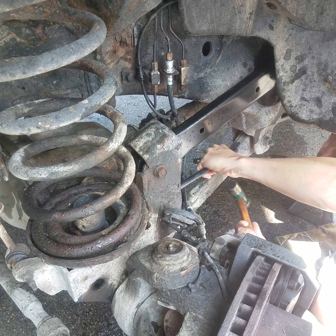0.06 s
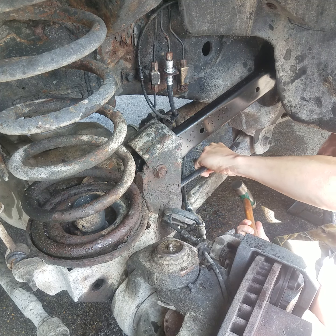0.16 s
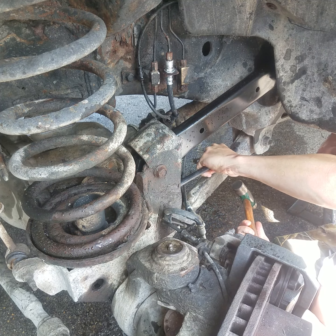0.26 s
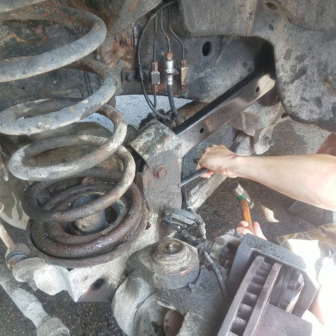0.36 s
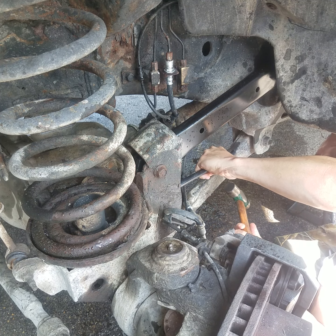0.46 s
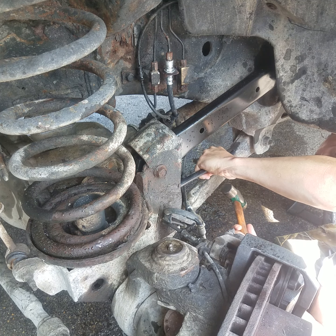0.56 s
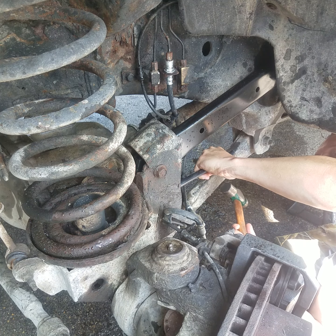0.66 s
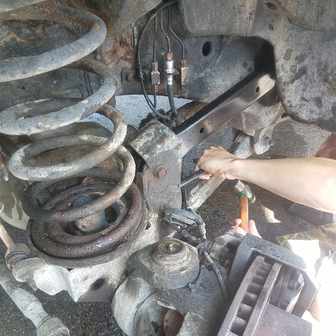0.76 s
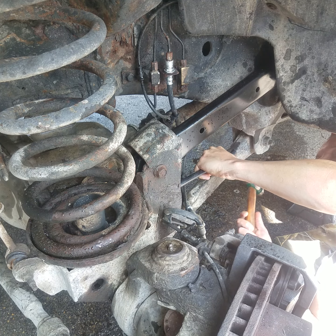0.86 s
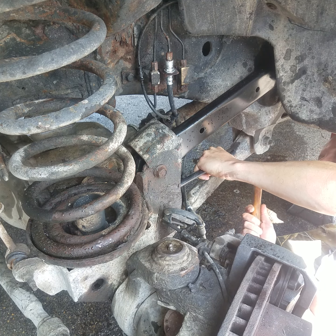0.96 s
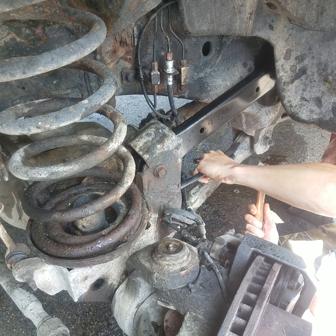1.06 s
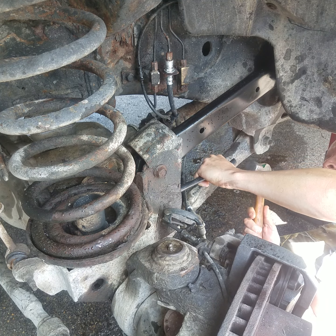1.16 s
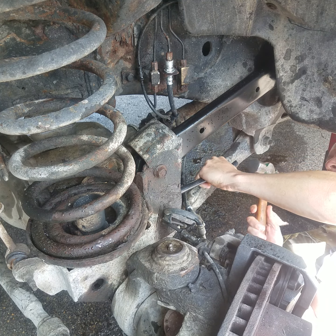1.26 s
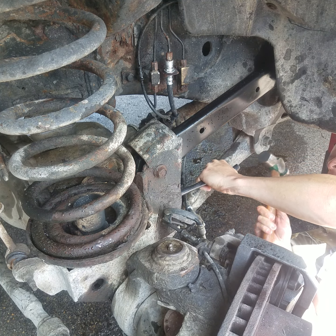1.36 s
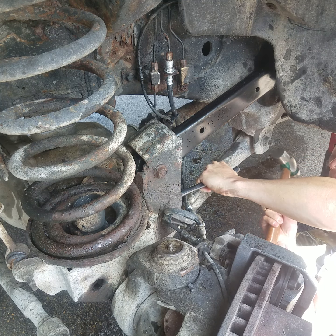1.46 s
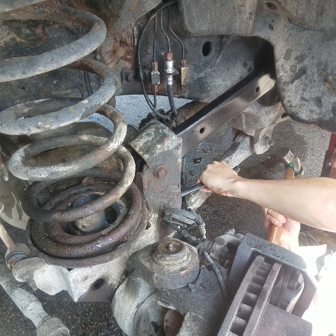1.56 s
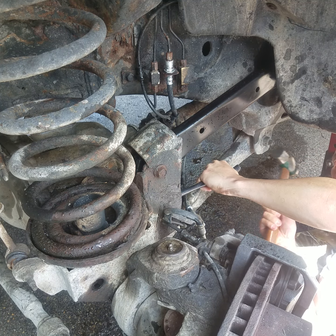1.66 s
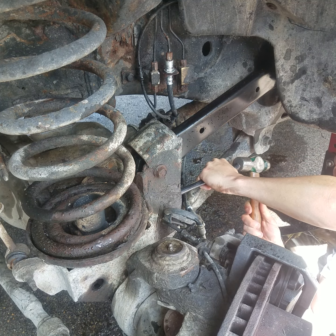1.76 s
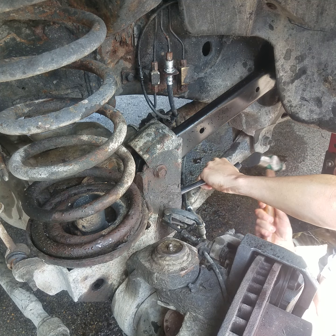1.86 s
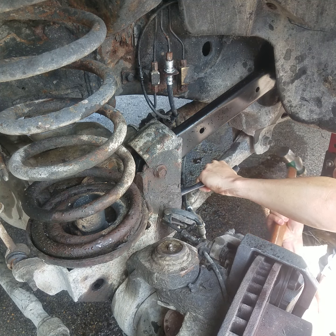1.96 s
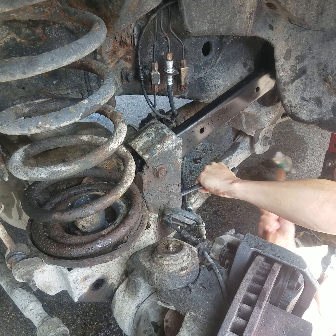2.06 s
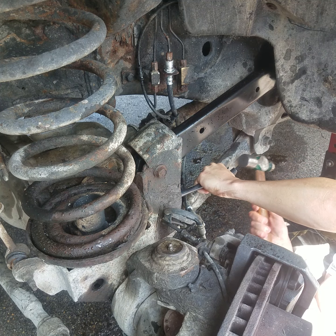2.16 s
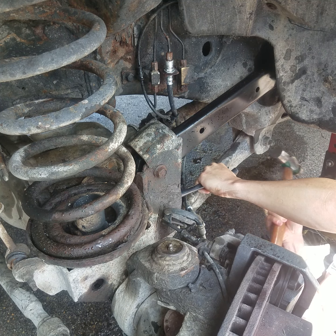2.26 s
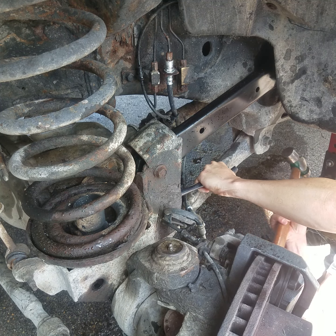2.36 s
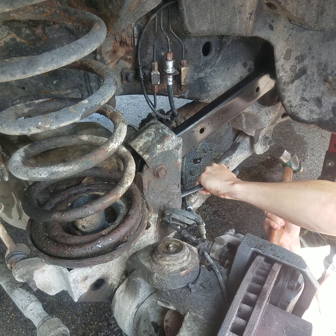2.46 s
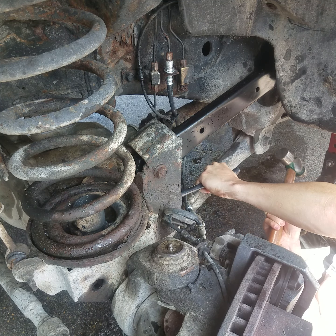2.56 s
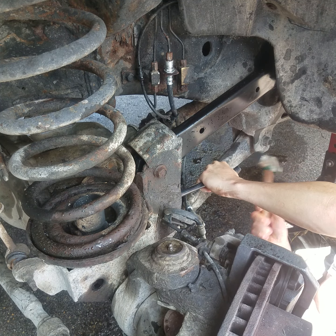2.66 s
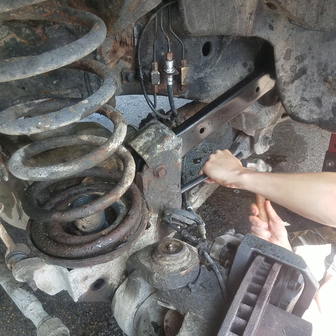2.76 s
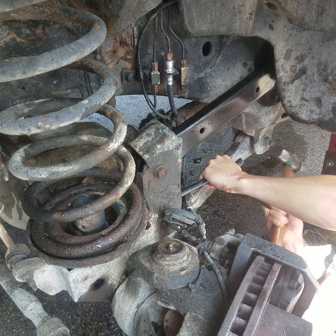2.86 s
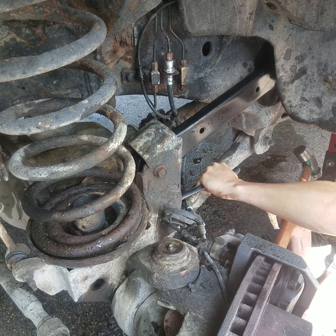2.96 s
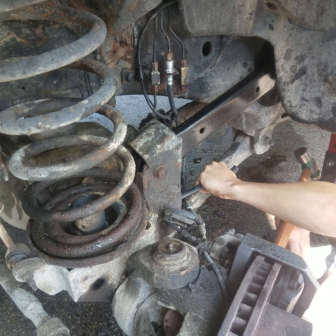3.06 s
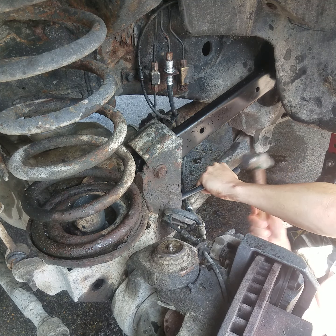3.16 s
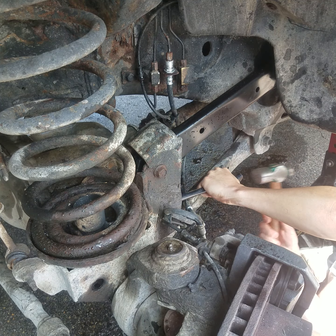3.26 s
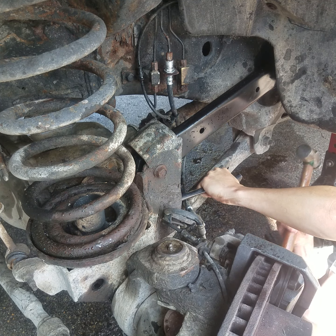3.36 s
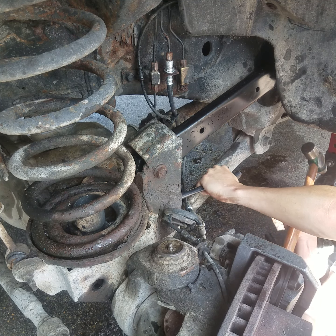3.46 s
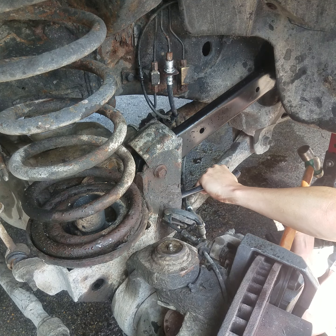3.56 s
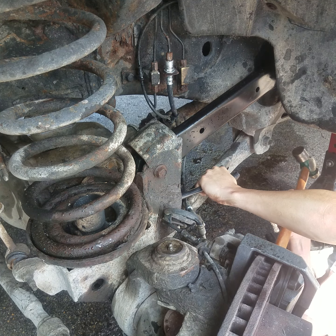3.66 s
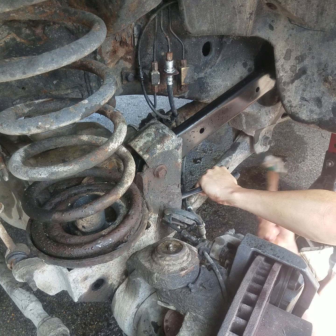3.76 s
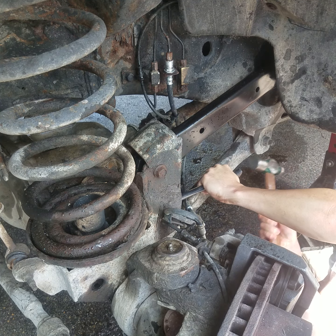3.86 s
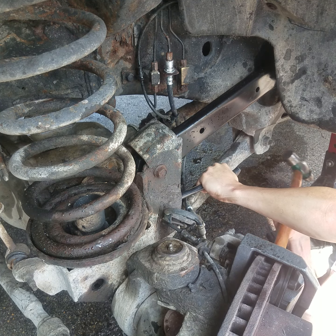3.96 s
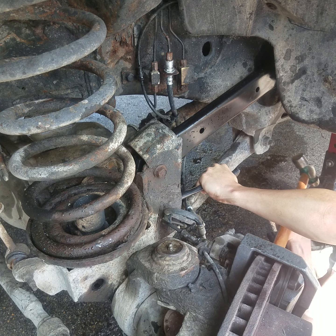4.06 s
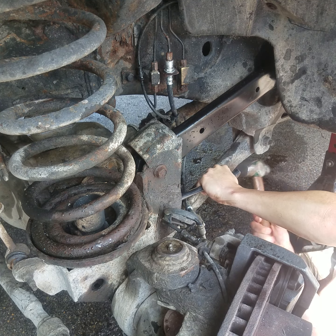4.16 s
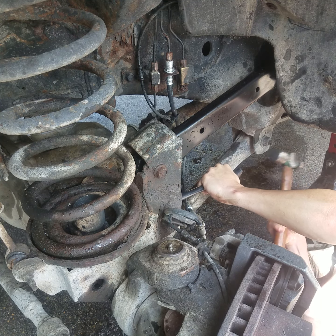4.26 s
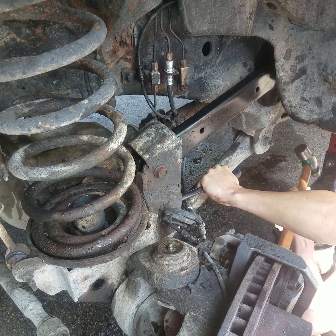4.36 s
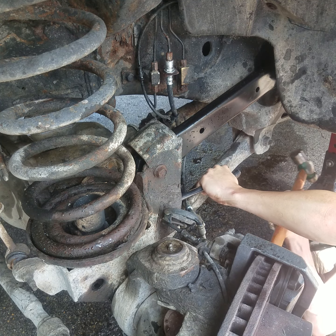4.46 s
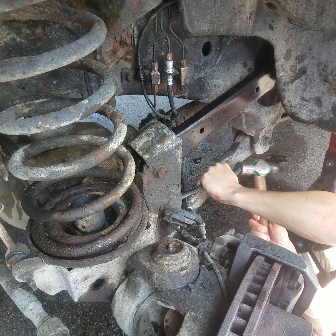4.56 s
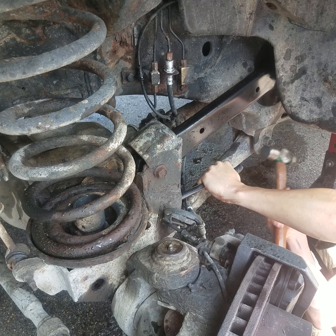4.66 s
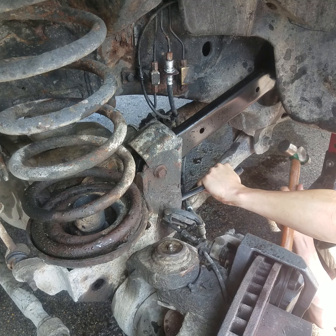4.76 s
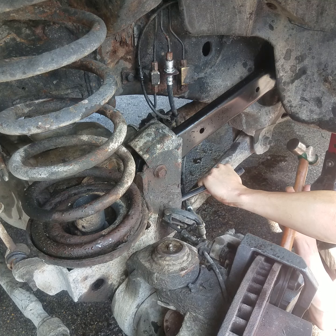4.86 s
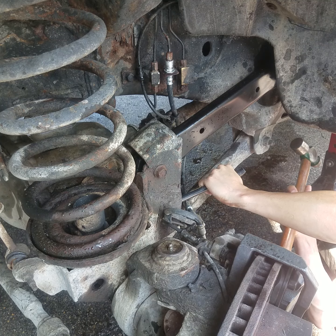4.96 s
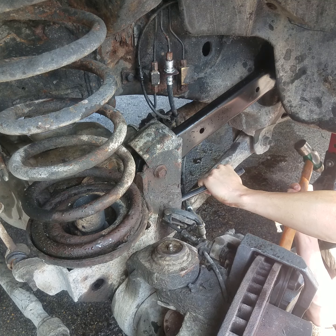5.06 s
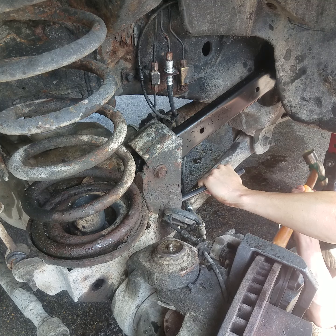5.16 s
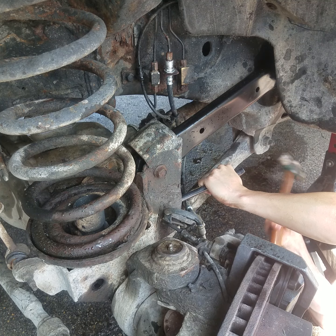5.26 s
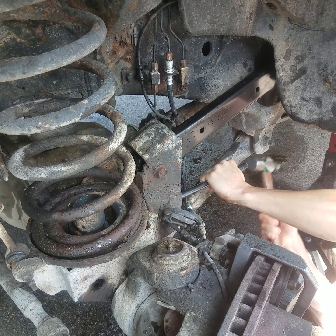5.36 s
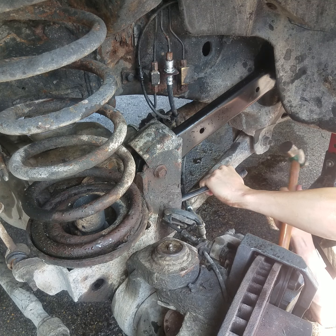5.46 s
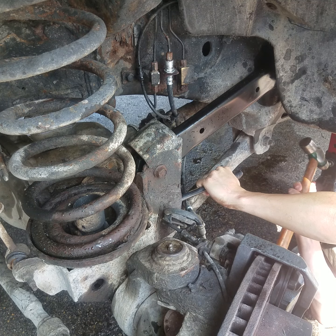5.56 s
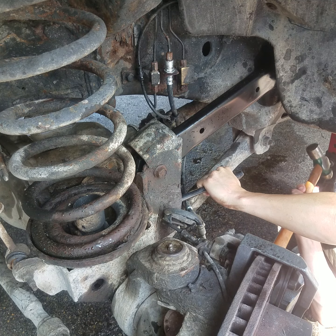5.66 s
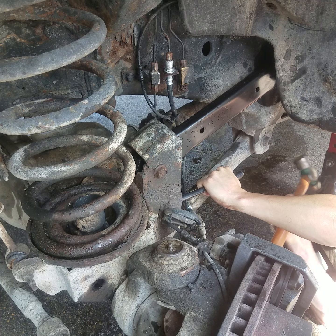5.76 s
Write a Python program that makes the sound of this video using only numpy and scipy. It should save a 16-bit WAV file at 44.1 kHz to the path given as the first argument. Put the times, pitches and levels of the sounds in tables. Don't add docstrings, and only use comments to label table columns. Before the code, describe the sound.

Close up under a car, a few weak taps and touches of a loose steel punch come first, then a pause over faint traffic, hum and hiss. Hard hammer blows follow at irregular gaps, each a sharp clang with rusty chatter and a late low thud. Some slip and knock a steel arm with a hollow boom. Small clinks and grit ticks fill the gaps. Stereo small-camera microphones, slightly overloaded.

```python
import sys
import numpy as np
from scipy import signal
from scipy.io import wavfile
from scipy.ndimage import uniform_filter1d

SR = 44100
rng = np.random.default_rng(int(sys.argv[2]) if len(sys.argv) > 2 else 0)


def pcm_store(signal):
    levels = np.round(np.clip(np.atleast_2d(signal), -1, 1) * 32767)
    wavfile.write(sys.argv[1], SR, levels.astype(np.int16).T)


def volts(x):
    e = np.asarray(x, float) / 20
    return 10 ** e


N = 256662
HALF_SECOND = SR // 2

# (pitch [Hz], level [dB])
TRAFFIC_COLOUR = [(12, -31), (20, -23.5), (43, -11.5), (124, 5), (189, -9), (297, -3.5), (404, -6.5),
                  (465, -5), (616, -7.5), (709, -8), (1390, -12.5), (7100, -37.5), (8890, -45.5),
                  (15200, -30), (16500, -47)]
# (pitch [Hz], likeness [0-1])
TRAFFIC_SAME = [(30, .6), (70, .8), (120, 1), (500, 0.96), (1600, 0.56), (5000, 0.16), (15000, 0.28)]
# (pitch [Hz], level [dB])
HISS_COLOUR = [(20, -47.5), (2000, -14.5), (7000, -9), (9500, -8.5), (12000, -1.5), (15500, -4.5),
               (16500, -3)]
# (time [s], air level [dB])
AIR_GAIN = [
    (0.0, -54),
    (1.66, -55.5),
    (2.0, -63.5),
    (3.9, -65),
    (4.45, -60.5),
    (5.0, -66.5),
    (5.82, -60.5),
]
# (time [s], low hum [dB], upper hum [dB])
HUMS = [(0.0, -58.5, -51), (0.5, -58.5, -78), (1.1, -62, -77), (1.65, -73.5, -69), (4.4, -70.5, -64),
        (5.1, -82, -71.5), (5.82, -76.5, -65)]

# (time [s], peak [dB])
GRIT = [(2.4384, -51), (2.4994, -60.5), (2.5482, -61), (2.6065, -51.5), (2.628, -49.5), (3.0094, -59),
        (3.0775, -57.5), (3.1059, -51), (3.3767, -49), (3.4186, -55), (3.4371, -50.5), (3.4547, -60),
        (3.5284, -52), (3.5523, -55), (3.5647, -51.5), (3.5848, -53.5), (3.5994, -64.5), (3.6304, -47.5),
        (3.6611, -45), (3.697, -48.5), (4.1028, -54), (4.111, -46), (4.123, -42), (4.4194, -63.5),
        (4.8494, -52.5), (5.1844, -56.5), (5.5071, -39.5), (5.6716, -58), (5.7613, -57)]
# (time [s], peak [dB], pitch [Hz], time to fade 60 dB [s], ring [dB])
TAPS = [(0.049, -22.5, 520, 0.036, -24), (0.262, -46, 1193, 0.071, 7), (0.322, -38.5, 540, 0.23, 4.5),
        (0.359, -37, 674, 0.04, -21), (1.447, -49.5, 460, 0.098, -23), (2.043, -40, 565, 0.057, 2),
        (2.939, -43, 498, 0.091, 6), (3.041, -42.5, 417, 0.024, -15), (3.6, -59.5, 813, 0.08, 11.5),
        (4.014, -41.5, 465, 0.029, -13.5), (4.451, -46.5, 547.5, 0.062, -4.5)]
# (time [s], peak [dB], pitch [Hz],
# brightness [dB per octave], ring [dB])
CLINKS = [(0.2157, -32, 1780, -55, -14), (0.3243, -33, 1740, -16, -4), (1.371, -44.5, 3030, -15, -5.5),
          (1.9958, -52.5, 2650, -14, -17), (2.0436, -46.5, 1650, -11, -3.0),
          (2.9433, -48, 2610, -12.5, 3.5), (4.014, -54.5, 1630, -17, -2.5), (4.9144, -61, 2900, -6, 4),
          (5.651, -44.5, 2890, -6, 8), (4.493, -63.5, 3050, -10, 3), (5.274, -43, 1500, -9.5, -17)]
# (time [s], level [dB])
TOUCHES = [
    (.013, -25),
    (.032, -37),
    (.05, -56),
    (.176, -59),
    (.324, -57),
    (.345, -49),
]
# (pitch [Hz], level [dB], time to fade 60 dB [s])
LOOSE_PUNCH = [(2360, -3, 0.12), (3160, -14, .2), (3580, -11, 0.11), (4950, -32, 0.17), (6500, -17.5, 0.1)]

# (time [s], peak [dB], low ring [dB], high ring [dB], clatter [dB])
KNOCKS = [
    (2.180, -6, -13.5, -38.5, -37.5),
    (2.191, -17.5, -11.5, -30.5, -45),
    (4.647, -5, -18.5, -10, -19),
    (5.378, -7.5, -11.5, -29.5, -22),
    (5.396, -7, -30, -11, -13.5),
    (5.409, -8.5, -31, -16, -20),
    (5.8145, -11.5, -15, -41, -44.5),
]
# (pitch [Hz], level [dB], time to fade 60 dB [s])
ARM_LOW = [(364.2, -15.5, 0.28), (436, -11, 0.27), (494.4, -3, 0.22), (590, -2.5, 0.19), (687, 2, 0.094),
           (805.4, -4, 0.095), (873, -18, 0.13)]
ARM_HIGH = [(1250, -6, 0.27), (1292, -3.5, 0.18), (1710, -11, 0.15), (1754, 5.5, 0.067),
            (2020, -12.5, 0.13), (1820, 10.5, 0.033), (2082, -3, 0.18), (2650, -15.5, 0.31),
            (3070, -2.5, 0.032)]
# (pitch [Hz], level [dB])
KNOCK_CLATTER = [(120, -45.5), (200, -12.5), (434, -20.5), (961, 3.5), (2010, 5.5), (3630, -6.5),
                 (4880, -24.5), (5250, -40.5), (14500, -49), (16500, -63)]
# (pitch [Hz], level [dB])
KNOCK_TICK = [(500, -6), (4500, 0), (7000, -14), (16000, -22)]

# (time [s], peak [dB], skew [-1 on the flank to 1 on the tip], shank ring [dB], face ring [dB])
BLOWS = [(0.011, -17.5, 0.5, -47, -59), (0.031, -34, -0.76, -42, -48), (0.174, -28.5, -.3, -32, -48),
         (1.715, 1, .95, -29, -16), (2.087, -4, -0.82, -22, -19.5), (2.668, -1, -.4, -20.5, -19.5),
         (3.146, -1.5, -.5, -23.5, -27), (3.768, -3.5, -0.85, -32, -31), (4.142, -3, .9, -25, -30.5),
         (4.527, -1.5, .15, -34, -13), (5.287, -1.5, -.3, -24, -50.5), (5.814, 1.5, 0.21, -35, -38)]
# (pitch [Hz], level [dB], time to fade 60 dB [s])
BRACKET = [(1144, -3, 0.057), (1458, -3, 0.11), (1570, -20, 0.22), (1795, 1.5, .105)]
SPRING = [(2008, 0, .85)]
PUNCH = [(2245, 0, .115), (2655, -14, .11)]
SHANK = [(4270, -14, .09), (5050, -3, .115), (6420, -8, .09)]
TIP = [(3055, -24.5, 0.13), (3365, 8, 0.048), (3590, 6, 0.094)]
COLLAR = [(5320, -2, .09), (7050, -14, .07)]
NECK = [(8740, -12, .055), (10900, -2, .07), (11600, -6, .06)]
HAMMER_FACE = [(12900, -8, .055), (14050, -2, .055), (15300, -7, .05)]
FRAME_THUD = [(306.6, -26, 0.46), (374, -1, 0.11), (462.3, -6, 0.16), (517, -10, 0.21)]
# (pitch [Hz], level [dB])
BLOW_CLATTER = [(120, -41), (200, -14.5), (1420, -5.5), (1770, -2.5), (2010, -11), (2250, -2.5),
                (4700, -11), (5160, -14.5), (5760, -18.5), (6550, -11.5), (9480, -13), (14200, -6),
                (16500, -28)]
# (pitch [Hz], time to fade 60 dB [s])
CLATTER_FADE = [(200, 0.43), (500, 0.17), (1400, 0.11), (4000, 0.13), (10000, 0.085), (16000, 0.046)]
# (pitch [Hz], time to fade 60 dB [s])
SPACE_FADE = [(200, 0.93), (500, 0.41), (1500, 0.44), (4000, 0.58), (9000, 0.32), (16000, 0.27)]


def evened(x):
    return x / np.sqrt(np.mean(x ** 2) + 1e-20)


def read(points, hz):
    f, value = np.transpose(points)
    return np.interp(np.log(hz + 1), np.log(f + 1), value)


def add(mix, s, sound):
    part = mix[:, round(s * SR):][:, :sound.shape[1]]
    part += sound[:, :part.shape[1]]


def after(events, rise_s, fall_s):
    t = np.arange(N) / SR
    shape_s = [0, max(rise_s, .001), rise_s + fall_s]
    return np.max([np.interp(t - row[0], shape_s, [0, 1, 0]) for row in events], axis=0)


def noise(size, colour, same, t60=None, frame=256, lag=0.):
    hz = np.fft.rfftfreq(frame, 1 / SR)
    t = np.arange(size * 4 // frame + 5) * frame / 4 / SR
    a, b, c, d = rng.standard_normal((len(t), len(hz), 4)).T
    same = np.clip(same if np.isscalar(same) else read(same, hz)[:, None], -1, 1)
    late = np.exp(-2j * np.pi * hz * lag)[:, None]
    left = a + 1j * b
    right = same * late * left + np.sqrt(1 - same ** 2) * (c + 1j * d)
    level = volts(read(colour, hz))[:, None]
    level = level / np.sqrt(np.mean(level ** 2))
    if t60:
        level = level * volts(-60 * t / read(t60, hz)[:, None])
    spectra = np.array([left, right]) * level
    return signal.istft(spectra, nperseg=frame, noverlap=frame * 3 // 4)[1][:, :size] / np.sqrt(frame)


def rattled(x, depth_db=2.0, grain=40):
    lumps = evened(uniform_filter1d(rng.standard_normal(x.shape[1]), round(grain)))
    return x * volts(depth_db * lumps - depth_db)


def ring(modes, blur_hz=28.8, rise=0.0039, swing=2.0, outer_db=-0.5, scatter=0.91, count=4):
    t = np.arange(HALF_SECOND) / SR
    hz, db, t60 = np.repeat(modes, count, axis=0).T[:, :, None]
    tune, turn, apart = rng.uniform(-1, 1, (len(hz), 3)).T[:, :, None]
    off = np.tile(np.arange(count), len(modes))[:, None]
    member_hz = hz + blur_hz * off * np.sign(tune) * (1 + 0.56 * tune)
    phase = 2 * np.pi * member_hz * t + scatter * np.pi * turn
    fade = volts(db + outer_db * (off > 0) - 60 * t * (1 + .5 * off) / t60)
    body = fade * (1 - np.exp(-t / rise))
    lead = swing * np.sign(apart) * (0.11 + 0.81 * abs(apart))
    return np.array([(body * np.sin(phase + side * lead)).sum(0) for side in (-.5, .5)])


def breeze():
    colour = [(20, -6.5), (45, -6), (90, -6.5), (200, -32), (400, -67.0)]
    rumble = evened(noise(N, colour, same=.6, frame=4096))
    return volts(-67.0) * rattled(rumble, depth_db=7.5, grain=5700)


def drone(hz, wander_hz, memory=2500):
    pitch, swell = (evened(uniform_filter1d(v, round(memory))) for v in rng.standard_normal((2, N)))
    tone = np.sin(2 * np.pi * np.cumsum(hz + wander_hz * pitch) / SR)
    return evened(tone * (1 + 0.29 * swell))


def air():
    t = np.arange(N) / SR
    boom = after(KNOCKS, rise_s=0.037, fall_s=0.17)
    traffic_gain = volts(np.interp(t, *np.transpose(AIR_GAIN)) + 11 * boom)
    s, *hums_db = np.transpose(HUMS)
    low_gain, upper_gain = (volts(np.interp(t, s, db) + 17.5 * boom) for db in hums_db)
    hiss_gain = volts(-74.5 - 11 * after(BLOWS[3:], rise_s=.03, fall_s=.45))
    traffic = evened(noise(N, TRAFFIC_COLOUR, TRAFFIC_SAME, frame=2048, lag=0.00034))
    traffic = traffic + volts(-36.5) * drone(7200, 39.0)
    hiss = evened(noise(N, HISS_COLOUR, 0.15, frame=512))
    hums = low_gain * volts(3.0) * drone(123.5, 2.3)
    hums = hums + upper_gain * volts(0.5) * drone(189, 12.0, memory=2400)
    return volts(2.5) * traffic_gain * traffic + volts(-1.5) * hiss_gain * hiss + hums


def space(x, turns_hz=21.5):
    t, out = np.arange(N) / SR, np.zeros((2, N))
    colour = [(150, -3.5), (500, 3.5), (4000, -2.5), (16000, 9.5)]
    for k in range(3):
        tail = noise(HALF_SECOND, colour, .2, SPACE_FADE)
        tail = tail * (1 - np.exp(-t[:HALF_SECOND] / 0.0083))
        share = np.sqrt(2 / 3) * np.cos(2 * np.pi * (turns_hz * t + k / 3))
        out += signal.fftconvolve(x * share, tail / np.linalg.norm(tail[0]), axes=1)[:, :N]
    return out


def grit(s, db):
    colour = [(1500, -27.0), (5000, -6.5), (11000, 0.5), (15000, 2.5)]
    fade = [(1000, 0.0094), (16000, .012)]
    return s, volts(db - 2.5) * noise(1300, colour, same=0.57, t60=fade, frame=64)


def tap(s, db, hz, t60, tilt_db, ring_db):
    t60 = max(t60, .01)
    colour = [(100, -22), (hz / 2.5, -5), (hz, 0), (6000, tilt_db * np.log2(6000 / hz)),
              (16000, tilt_db * np.log2(16000 / hz) - 2.5)]
    fade = [(200, 3.8 * t60), (16000, 0.2 * t60)]
    rattle = rattled(noise(HALF_SECOND, colour, 0.11, fade, frame=128))
    tones = ring([(hz, -6, t60), (hz * 1.98, -17, t60)], blur_hz=40.)
    return s, volts(db - 2.0) * (rattle + volts(ring_db) * tones)


def low_tap(s, db, hz, t60, ring_db):
    return tap(s, db, hz, t60, tilt_db=-12, ring_db=ring_db)


def clink(s, db, hz, tilt_db, ring_db):
    return tap(s, db, hz, t60=.07, tilt_db=tilt_db, ring_db=ring_db)


def punch_touch(s, db):
    return s, volts(db) * ring(LOOSE_PUNCH, blur_hz=15., outer_db=-15.0, count=2)


def knock(s, db, low_db, high_db, clatter_db):
    low = ring(ARM_LOW, blur_hz=5.3, swing=0.28, outer_db=-5.0, rise=0.00097, scatter=0.46)
    rings = volts(low_db + 2.5) * low + volts(high_db - 5.0) * ring(ARM_HIGH)
    clatter = rattled(noise(HALF_SECOND, KNOCK_CLATTER, 0.1, CLATTER_FADE, frame=128))
    clatter = volts(clatter_db + 19.5) * clatter * (1 - np.exp(-np.arange(HALF_SECOND) / SR / 0.0052))
    tick = noise(HALF_SECOND, KNOCK_TICK, .5, [(1000, .05), (16000, .03)], frame=128)
    tick = volts(-24 + .3 * low_db) * tick
    spring = volts(clatter_db - 27) * ring(SPRING, count=1)
    return s, volts(db - 2) * (rings + clatter + tick + spring)


def blow_clatter(treble_db):
    hz, db = np.transpose(BLOW_CLATTER)
    colour = np.transpose([hz, db + np.interp(hz, [6000, 10000], [0, treble_db + 6.5])])
    chatter = rattled(noise(HALF_SECOND, colour, 0.11, CLATTER_FADE, frame=128, lag=.0003))
    t = np.arange(HALF_SECOND) / SR
    return volts(-0.53) * chatter * (1 - np.exp(-t / 0.0017)) * (1 + .8 * np.exp(-t / 0.0031))


def frame_thud():
    thud = ring(FRAME_THUD, blur_hz=27.6, rise=0.039, swing=0.5)
    return np.pad(thud, ((0, 0), (round(.016 * SR), 0)))[:, :HALF_SECOND]


def blow(s, db, bracket_db, punch_db, shank_db, treble_db, tip_db, collar_db, face_db, thud_db, neck_db):
    rings = volts(bracket_db - 4.0) * (ring(BRACKET) + volts(-39.5) * ring(SPRING, count=1))
    rings += volts(punch_db + 8.0) * ring(PUNCH)
    rings += volts(shank_db + 8) * ring(SHANK, blur_hz=39.0, rise=0.002, outer_db=-3.0)
    accents = volts(tip_db - 10.5) * ring(TIP, blur_hz=38.0)
    accents += volts(collar_db + 3.0) * ring(COLLAR)
    accents += volts(face_db - 0.5) * ring(HAMMER_FACE, blur_hz=110., rise=.001, outer_db=-3.0)
    accents += volts(neck_db - 4.5) * ring(NECK, blur_hz=108.0, rise=0.00081, outer_db=-8.0)
    body = rings + blow_clatter(treble_db) + volts(thud_db) * frame_thud()
    return s, volts(db - 5.0) * body + accents


def landing(s, db, skew, shank_db, face_db):
    frame_db = max(db, -2.5)
    bracket = -11.5 - .6 * skew - 1.8 * frame_db
    thud = -15 - 0.43 * skew - 4.3 * frame_db
    punch = -24.5 - 9.5 * skew - .2 * db
    tip = -17 + 5.8 * skew + 0.61 * db
    collar = -27.5 - 8.5 * skew + 0.99 * db
    neck = -30 + 13 * skew + .6 * db + .45 * (face_db + 25.5)
    treble = -10 - 1.5 * skew + .8 * db + .2 * (shank_db + 25)
    return blow(s, db, bracket, punch, shank_db, treble, tip, collar, face_db, thud, neck)


def scene():
    steel = np.zeros((2, N))
    for source, rows in ((grit, GRIT), (low_tap, TAPS), (clink, CLINKS), (punch_touch, TOUCHES),
                         (knock, KNOCKS), (landing, BLOWS)):
        for row in rows:
            add(steel, *source(*row))
    no_bass = signal.butter(4, 170, "high", fs=SR, output="sos")
    steel = signal.sosfilt(no_bass, steel)
    left_right = volts(np.array([[.5], [-.5]]))
    return (steel + volts(-18.5) * space(steel)) * left_right + air() + breeze()


def roll_off(x):
    return signal.sosfilt(signal.butter(12, 16850, fs=SR, output="sos"), x)


def record(dry):
    overloaded = 1.157 * np.tanh(dry / 0.83)
    band_limit = signal.firwin(255, 16650, window=("kaiser", 9), fs=SR)
    mix = signal.oaconvolve(overloaded, band_limit[None], "same")
    return roll_off(mix)


dry = scene()
out = record(dry)
pcm_store(out)
```